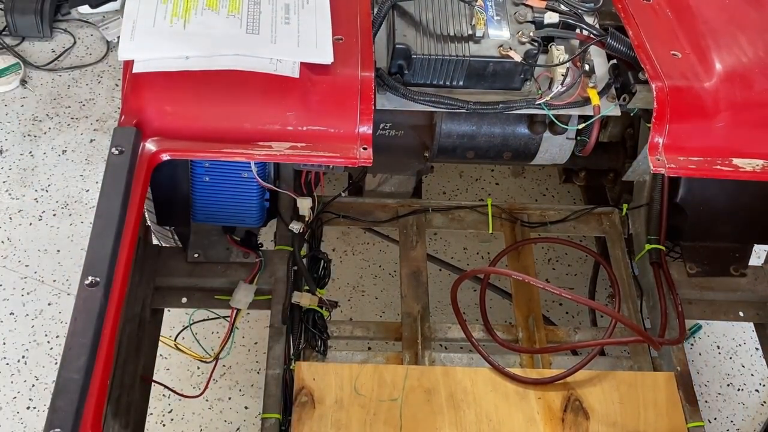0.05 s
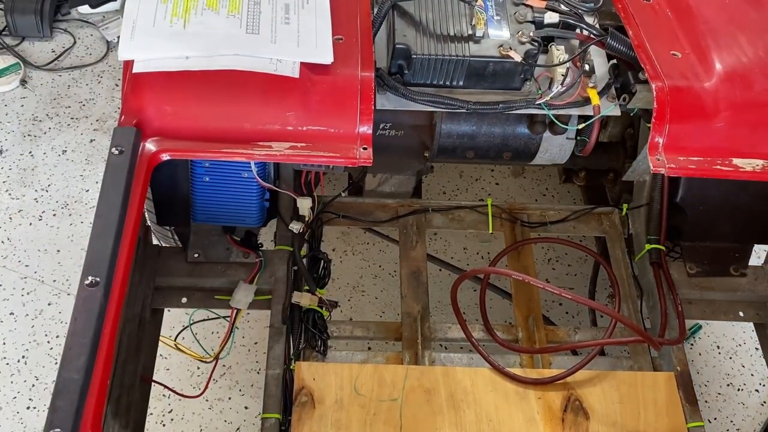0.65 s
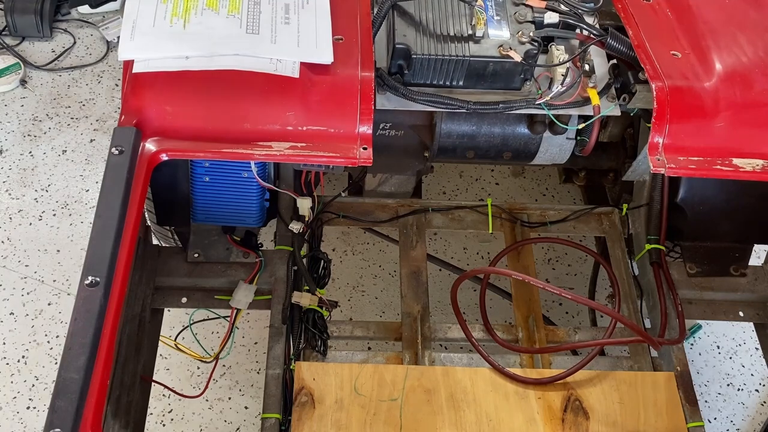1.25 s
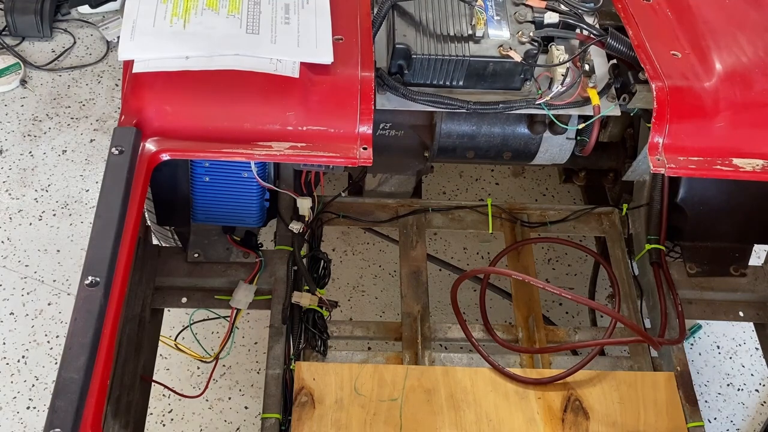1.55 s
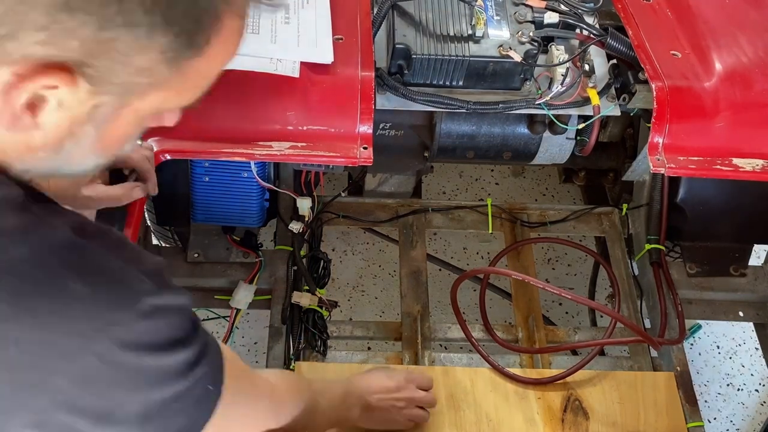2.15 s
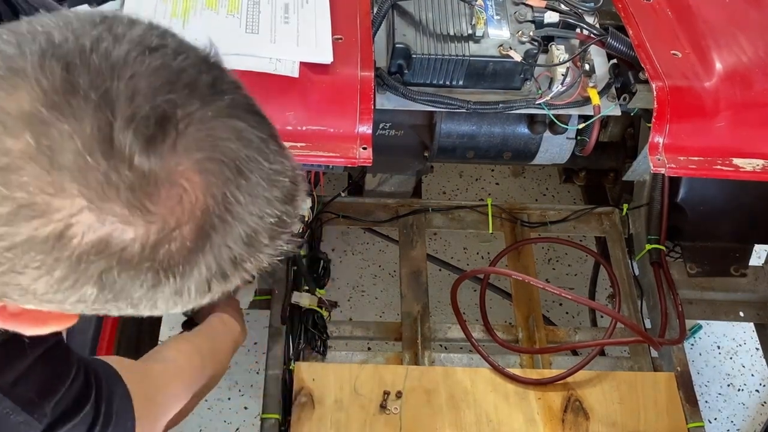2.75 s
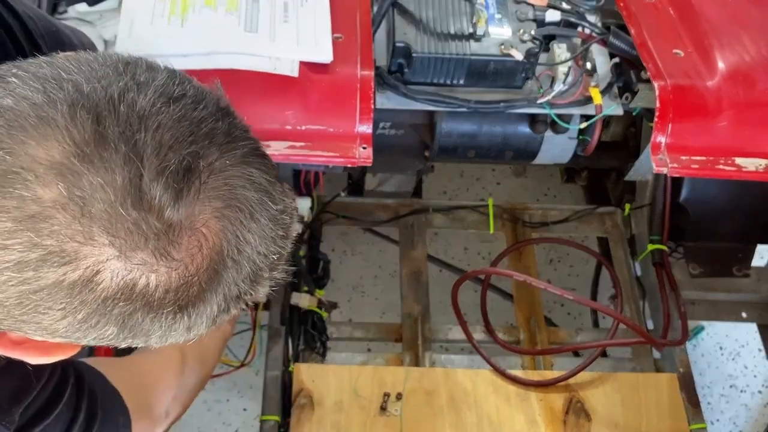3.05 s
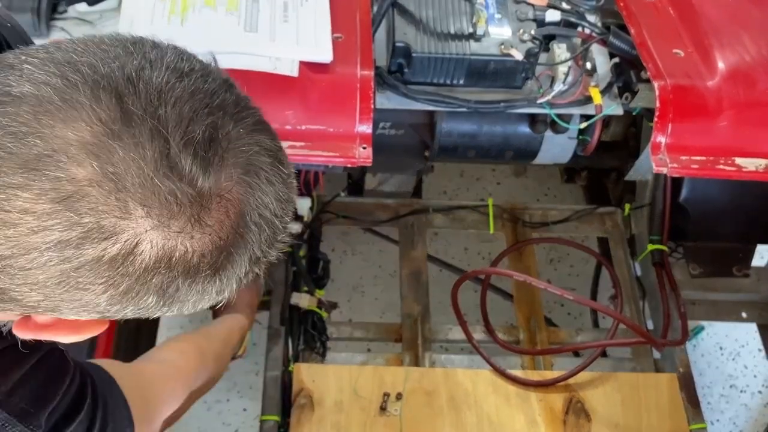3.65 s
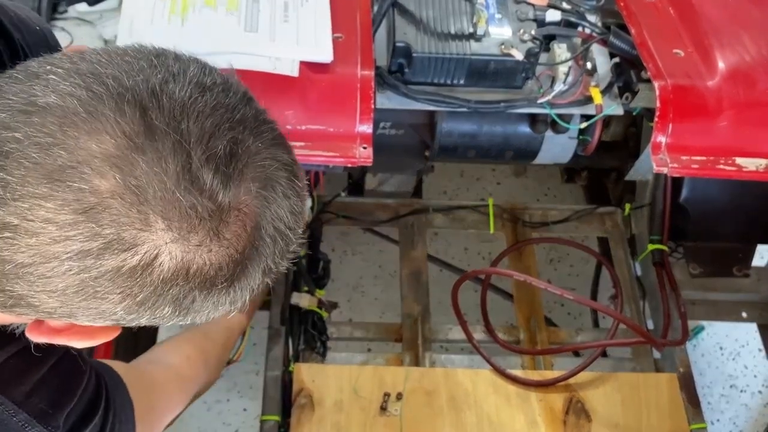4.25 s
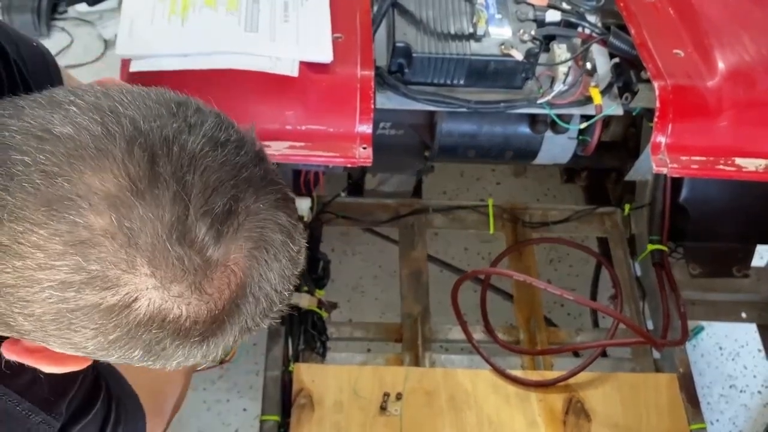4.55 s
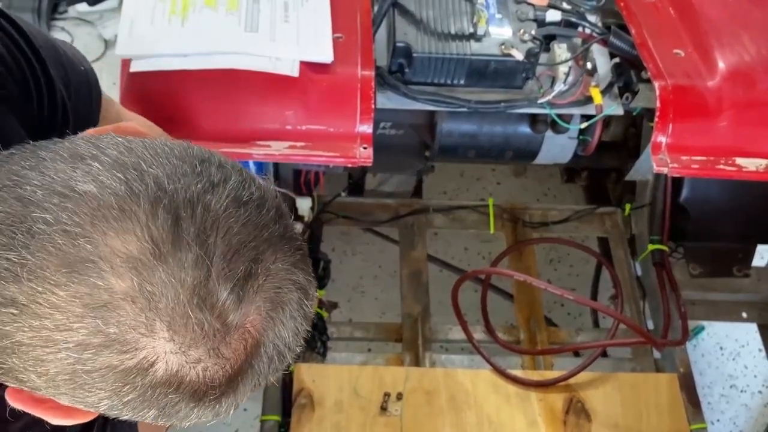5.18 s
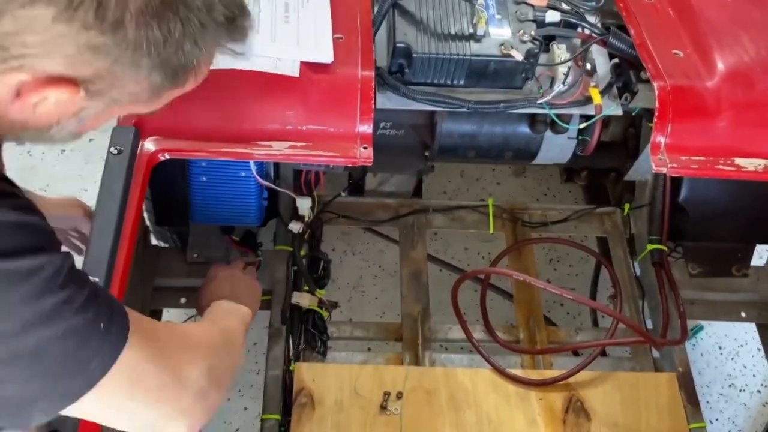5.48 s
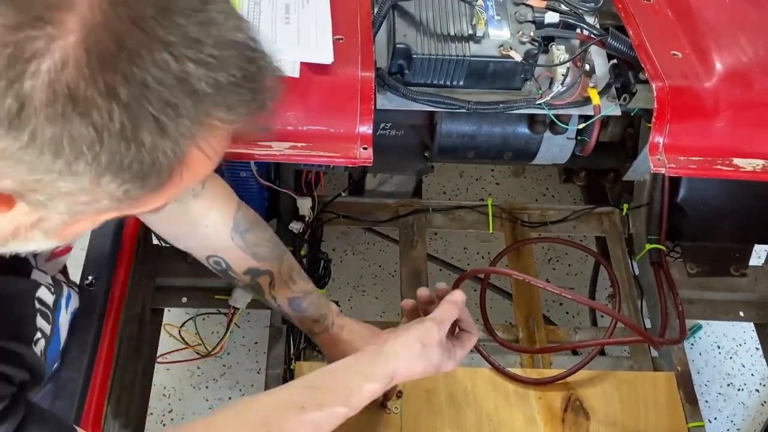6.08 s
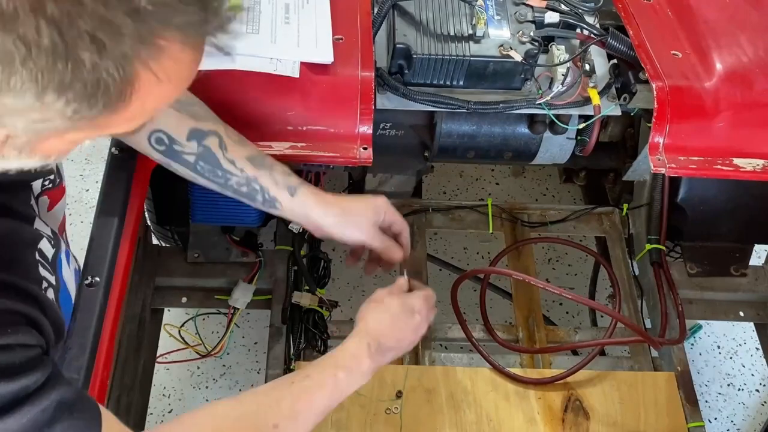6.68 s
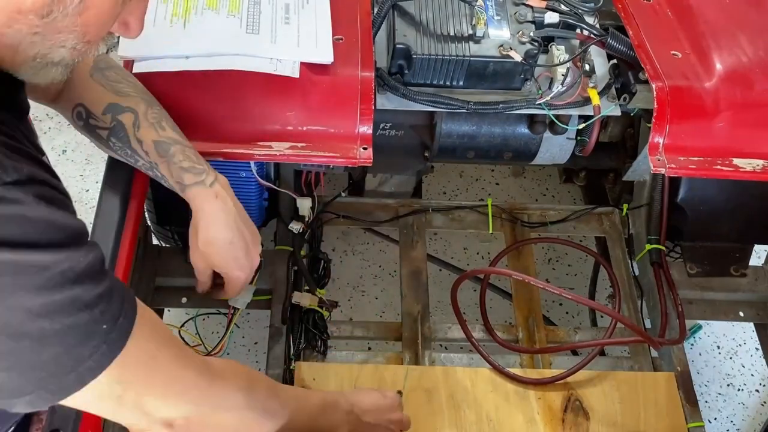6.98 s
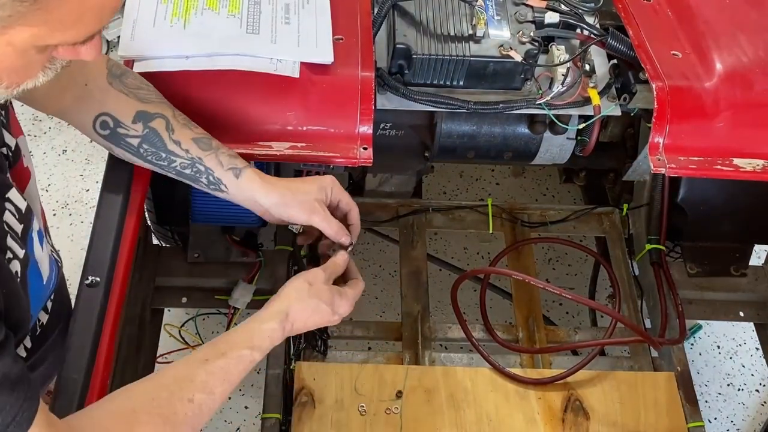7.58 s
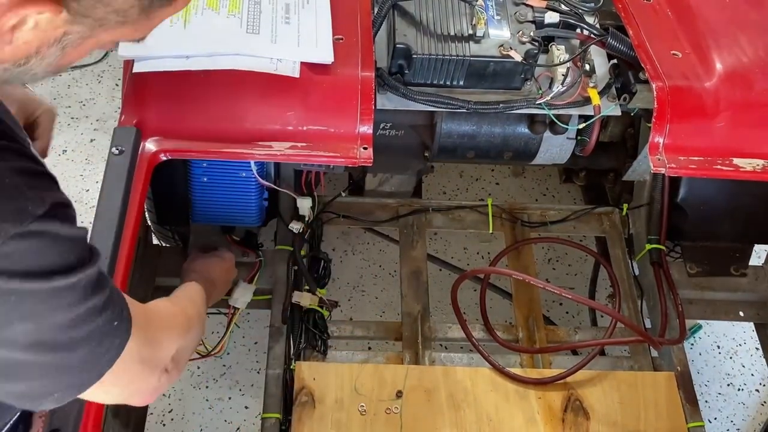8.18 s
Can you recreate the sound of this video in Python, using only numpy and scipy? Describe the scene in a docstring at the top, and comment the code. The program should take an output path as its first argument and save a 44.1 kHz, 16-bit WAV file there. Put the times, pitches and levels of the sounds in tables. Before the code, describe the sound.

Small steel parts are handled up close over the steady low hum of a machine in a garage. Soft knocks and cloth swishes lead to a quick clatter of fasteners on wood. Washers chatter on bolts, muted by fingers, and hands thump a metal frame. The sharpest clink settles in a few dull taps, followed by sparse light clicks and some closing knocks.

```python
"""In a garage, steel washers are picked off a board and fitted over bolts on the frame of a small cart.
Fingers damp them, so each clink is a short chatter that shakes bracket and frame. Loose hardware
clatters and ticks, hands knock the board and frame, and sleeves rustle as the arms move.
Nearby panels and the walls scatter the contacts; behind them a machine rumbles and hums low."""
import sys
import numpy as np
from scipy import signal
from scipy.fft import rfft, irfft, next_fast_len
from scipy.io import wavfile
from scipy.ndimage import map_coordinates

SR = 44100
rng = np.random.default_rng(int(sys.argv[2]) if len(sys.argv) > 2 else 0)


def put_to_file(sound):
    """Save the sound as 16-bit audio at rate SR, in the file named by the first command-line argument."""
    columns = np.atleast_2d(sound).T  # one column per channel
    safe = np.clip(columns, -1, 1)
    whole_steps = np.round(safe * 32767)
    wavfile.write(sys.argv[1], SR, whole_steps.astype(np.int16))


N = 367353

# Washer hits: t/s, swell/s, t60/s, blow/dB, clank over blow/dB, ring over blow/dB,
# edge over ring/dB, note over ring/dB, pitch/Hz
CLINKS = [(3.113, 0.0059, 0.04, -42, -7, -12.5, -11, -10, 7240),
          (3.132, 0.014, 0.061, -43.5, 3.5, -9, -20, -4, 7100),
          (3.173, 0.0042, 0.049, -38, -19, 3, -1.5, -12.5, 6160),
          (3.221, 0.01, 0.045, -53, 3, -5, -2, -6, 7100),
          (3.362, 0.011, 0.022, -44, -1.5, 0, 0.5, -0.5, 7320),
          (3.411, 0.0043, 0.06, -45, -1.5, 4, -8, -0.5, 6830),
          (4.929, 0.0053, 0.028, -42.5, 4, 4, -23.5, 7, 5330),
          (5.073, 0.0027, 0.031, -47, 7, -3, -32, -0.5, 6740),
          (5.137, 0.0047, 0.035, -62.5, 7.5, -1.5, -8, 9, 6900),
          (5.184, 0.0075, 0.22, -44.5, 0, -9, 4, -3.5, 6000),
          (5.2274, 0.004, 0.004, -30.5, 1.5, -7.5, 5.5, 7, 6820),
          (8.255, 0.0024, 0.016, -52.5, 5, 4, -37.5, 2.5, 6950)]
# Modes of the struck parts: f/Hz, width/Hz, level/dB
FRAME = [(190, 90, -3), (305, 110, -.5), (460, 130, 0), (790, 260, -1.5)]  # the cart's low thud
BRACKET = [(1815, 130, -2), (2490, 160, -5), (3270, 180, 0)]
CLANK = [(1385, 190, 0)]  # the bracket's low note
WASHER = [(4600, 450, -2), (5380, 350, -6), (6350, 450, -4), (6950, 400, 2)]
EDGE = [(9850, 700, 0), (10700, 700, -3), (14000, 1500, -14)]  # the washer's top sparkle
# Tone of the steel-on-steel snap: f/Hz, level/dB
SNAP = [(600, -10), (2200, -1), (7800, 0), (15000, -20)]
GRIP_WIDTH_HZ = 320  # fingers damp a ring to this width

def clinks():
    """A held washer chatters on a bolt: it rings at a pitch set by the grip and shakes the cart."""
    track = np.zeros(N)
    for s, rise, t60, blow_db, clank_db, ring_db, edge_db, note_db, pitch_hz in CLINKS:
        effort_db = blow_db + 41.5  # over a middling blow
        washer_db = blow_db + ring_db
        force = chatter(rise, t60, spread_db=4)
        # a light washer hardly moves the frame in the bass
        push = filtered(force, lambda f: 1j * f / (480 + 1j * f))
        add(track, s, -42.5 + .45 * effort_db, ring(push, FRAME))
        add(track, s, blow_db + clank_db, ring(ring(force, gripped(CLANK)), gripped(CLANK)))
        add(track, s, blow_db - .5, ring(force, gripped(BRACKET)))
        add(track, s, washer_db + 4, ring(force, gripped(WASHER)))
        note = [(pitch_hz, GRIP_WIDTH_HZ, 0)]
        add(track, s, washer_db + note_db, ring(ring(force, note), note))
        add(track, s, washer_db + edge_db, ring(force, EDGE))
        # the contact itself snaps and scratches, filling the gaps between the modes
        add(track, s, washer_db + 1.5, equalised(chatter(rise, t60, spread_db=3.5), SNAP))
        # the rattle makes an octave that grows as the square of the blow
        add(track, s, -55.5 + 2 * effort_db, ring(force, [(2 * pitch_hz, 500, 0)]))
    return track


# Hard hits on the board, from loose hardware and a landing fingertip: t/s, contact/s, t60/s, level/dB, thud
# over level/dB, pitch/Hz, treble roll-off/Hz
CLACKS = [(0.234, 0.0033, 0.088, -58.5, -23, 2840, 11100), (1.672, 0.0044, 0.042, -47.5, -8.5, 3000, 13800),
          (2.1849, 0.00041, 0.0092, -32, -10, 2420, 5200), (2.247, 0.0032, 0.092, -36.5, -20, 2350, 3600),
          (2.313, .012, 0.11, -43, -38, 2530, 9200), (2.68, 0.0019, 0.067, -56.5, -2, 3600, 7000),
          (6.899, 0.0026, 0.1, -60, -0.5, 3360, 7560), (7.271, 0.0013, 0.019, -50.5, -8, 5500, 6000)]
# Modes of the wooden board: f/Hz, width/Hz, level/dB
BOARD = [(1000, 350, -1.5), (1330, 250, -3), (1950, 400, -5), (2490, 250, -1), (3600, 700, -2)]

def clacks(clatter_width_hz=10400):
    """Loose hardware, and once a fingertip, clatters on the wooden board, whose give takes off the treble."""
    track = np.zeros(N)
    for s, contact_s, t60, db, thud_db, pitch_hz, top_hz in CLACKS:
        force = chatter(contact_s, t60, spread_db=3)
        soften = signal.butter(2, top_hz, fs=SR)
        clatter = signal.lfilter(*soften, signal.lfilter(*soften, force))
        add(track, s, db, ring(clatter, [(pitch_hz, clatter_width_hz, 0)]))
        add(track, s, db - .5, ring(force, [(pitch_hz, GRIP_WIDTH_HZ, 0)]))
        add(track, s, db + thud_db, ring(force, FRAME[-1:] + BOARD[:2]))
    return track


# Hand hits: t/s, contact/s, thump/dB, hardness (clack over thump)/dB
KNOCKS = [(0.384, 0.007, -60, -14), (0.979, 0.012, -54, -5.5), (1.124, 0.003, -62.5, -1.5),
          (1.289, 0.011, -47, -19.5), (1.433, 0.0071, -53.5, -9.5), (1.556, 0.0094, -50, -13),
          (1.797, 0.026, -44, -11), (2.717, 0.0056, -50, -10.5), (2.877, 0.0086, -49.5, -14.5),
          (2.944, 0.0027, -57, -14.5), (3.045, 0.007, -55.5, -19.5), (3.552, 0.0024, -41.5, -15),
          (3.992, 0.011, -37.5, -19), (4.462, 0.0041, -47.5, -23), (4.528, 0.0063, -36, -29.5),
          (4.635, 0.027, -42.5, -19.5), (4.66, 0.0084, -41.5, -16.5), (4.694, .004, -51.5, -7),
          (4.716, 0.019, -40, -13), (5.654, 0.0019, -52.5, -12), (5.801, 0.003, -48.5, -8.5),
          (6.938, 0.0027, -51.5, -18), (6.965, 0.0023, -61, -5.5), (8.205, 0.0026, -43.5, -3.5),
          (8.27, 0.0015, -43.5, -11.5), (8.304, 0.0047, -41, -10.5)]
# Tone of a hand scuffing the board: f/Hz, level/dB
SCUFF = [(1000, -16), (5000, -20), (15000, -22)]

def knocks(slide_s=.038):
    """Knuckles meet frame and board: a soft contact thumps, a hard one clacks, a slow one scuffs."""
    track = np.zeros(N)
    for s, contact_s, thump_db, hardness_db in KNOCKS:
        t60 = .071 * (contact_s / .0066) ** .52  # a slower contact also dies more slowly
        force = chatter(contact_s, t60, spread_db=4.5)
        corner_hz = 634 * amp(.65 * hardness_db)  # a soft push shakes only the lowest modes
        push = filtered(force, lambda f: 1 / (1 + 1j * f / corner_hz))
        add(track, s, thump_db, ring(push, FRAME))
        clack_db = thump_db + hardness_db
        damping = 2 + contact_s / slide_s  # a hand that stays on the board deadens it
        damped_board = [(hz, width * damping, db) for hz, width, db in gripped(BOARD)]
        add(track, s, clack_db, ring(force, damped_board))
        add(track, s, clack_db - .5, ring(force, gripped(CLANK)))
        slide_db = 20 * np.log10(contact_s / (contact_s + slide_s))
        add(track, s, clack_db + 20.5 + slide_db, equalised(force, SCUFF))
    return track


def settling(count, start_s=5.287, gap_s=.042, first_db=-52, loss_db=2):
    """After the hardest clink a loose part rocks to rest in even, dull taps on frame and bracket."""
    track = np.zeros(N)
    for k in range(count):
        force = chatter(rise=.0014, t60=.017, spread_db=12.5)
        add(track, start_s + k * gap_s, first_db - k * loss_db, ring(force, FRAME + CLANK + BRACKET[:1]))
    return track


# Tiny edge-on ticks: t/s, level/dB, t60/s
TICKS = [(0.136, -43, 0.018), (4.147, -51.5, 0.0048), (4.186, -50.5, 0.016), (4.255, -47, .025),
         (4.303, -50.5, 0.07), (7.999, -53.5, 0.072)]
# Their bright tone: f/Hz, level/dB
TICK_TONE = [(2000, -10), (5500, -3), (10000, 4), (15000, 3.5)]

def ticks():
    """Small parts touch edge to edge between the fingers, too damped to ring."""
    track = np.zeros(N)
    for s, db, t60 in TICKS:
        force = chatter(rise=.091 * t60, t60=t60, spread_db=7)
        add(track, s, db, equalised(force, TICK_TONE))
    return track


# Swishes of cloth and shoe: t/s, half length/s, level/dB
BRUSHES = [(.009, 0.0095, -51.5), (0.149, 0.038, -59), (0.73, 0.022, -62.5), (0.887, 0.018, -60.5),
           (1.783, 0.095, -61.5), (2.189, 0.027, -48)]
# Rubbing squeaks: t/s, half length/s, level/dB, pitch/Hz
SQUEAKS = [(1.92, .011, -60.5, 3500), (2.0, 0.016, -61, 1060), (4.17, .075, -72.5, 1870),
           (6.02, .025, -75, 4550), (6.64, .035, -74.5, 4450)]

def brushes():
    """Cloth brushes with a broad hiss; rubbing surfaces squeak faintly in a narrow band."""
    cloth = sum(stroke(*row, hz=2880, width_hz=5000) for row in BRUSHES)
    squeaks = sum(stroke(s, half, db, hz, width_hz=.2 * hz) for s, half, db, hz in SQUEAKS)
    return cloth + squeaks


def stroke(s, half, db, hz, width_hz):
    """A stroke of friction: a swell of grainy noise around one resonance."""
    track, t = np.zeros(N), np.arange(N) / SR
    near = np.abs(t - s) < .15
    grains = amp(2 * rng.standard_normal(near.sum())) * rng.standard_normal(near.sum())
    swell = np.exp(-.5 * ((t[near] - s) / half) ** 2)
    body = [(hz, width_hz, 0)]
    track[near] = amp(db) * swell * unit(ring(ring(grains, body), body))
    return track


# Fader ride of the moving arms: t/s, relative level/dB
ARM_MOTION = [(0.0, -72.5), (0.37, -80), (1.37, -73), (1.81, -68), (2.6, -76), (3.43, -72), (3.76, -78.5),
              (4.43, -72.5), (4.89, -74.5), (5.24, -70), (6.52, -79.5), (7.89, -81.5), (8.33, -68)]
# Tone of the sleeve cloth: f/Hz, level/dB
SLEEVE = [(150, 25), (900, 16), (6000, 4.5), (12000, 0)]

def sleeves():
    """Sleeves rub as the arms move; catching fibres make the rustle grainy."""
    strokes_db = 1.5 * wobble(30)
    fibres = unit(amp(1.5 * wobble(650)))
    return amp(ride(ARM_MOTION) + 8 + strokes_db) * fibres * stereo_noise(SLEEVE)


# Fader ride shared by rumble and hum: t/s, relative level/dB
MACHINE_LEVEL = [(0.0, -54.5), (1.76, -51), (6.17, -51.5), (6.45, -55), (8.33, -52)]
# Tones of the fan's rumble and of its airflow: f/Hz, level/dB
RUMBLE = [(15, -7.5), (45, -5.5), (65, 2), (98, 2), (135, -5), (200, -14), (400, -28.5), (1000, -82.5)]
AIR = [(100, -10.5), (250, 4), (750, -4), (1400, -12), (2300, -20), (7000, -65)]

def machine():
    """A fan rumbles and moves air, with a wavering hum and a thin whistle."""
    level_db = ride(MACHINE_LEVEL)
    hum_hz = 97 + 2.82 * wobble(5)
    hum = amp(level_db - 8 + .82 * wobble(3.2)) * np.sin(2 * np.pi * np.cumsum(hum_hz) / SR)
    air = amp(-66.8 + .9 * wobble(6)) * stereo_noise(AIR)
    whistle = amp(-80) * unit(ring(rng.standard_normal((2, N)), [(2964, 55, 0)]))
    rumble = amp(level_db - 1.5) * stereo_noise(RUMBLE)
    return rumble + hum + air + whistle


# Decay off the nearby panels and off the walls: f/Hz, t60/s
PANELS = [(7000, 0.077), (14000, 0.083)]
WALLS = [(150, 0.36), (4000, 0.13), (15000, 0.03)]

def garage(x, panels_db, walls_db, new_place_s=.3):
    """Panels scatter at once and walls add a faint tail, both drawn afresh as the hands move on."""
    heard, step = x.copy(), round(new_place_s * SR)
    for i in range(0, N, step):
        panels, walls = tail(PANELS), tail(WALLS)
        t = np.arange(walls.shape[1]) / SR
        room = amp(panels_db) * unit(panels * (t > .003)) + amp(walls_db) * unit(walls)
        echo = signal.fftconvolve(x[:, i:i + step], room / np.sqrt(len(t)), axes=1)[:, :N - i]
        heard[:, i:i + echo.shape[1]] += echo
    return heard


def tail(t60s):
    """Dense reflections: stereo noise in which each band dies at its own rate."""
    hz, t, bands = signal.stft(rng.standard_normal((2, SR // 2)), SR, nperseg=256)
    return signal.istft(bands * amp(-60 * t / along(t60s, hz)[:, None]), SR, nperseg=256)[1]


# Phase lead of the left channel: f/Hz, lead/rad
LEFT_LEAD = [(300, 0.11), (1300, 1.15), (2500, 1.5)]

def placed(x, pan_db):
    """The hands reach the left channel a little earlier, and louder in the midrange."""
    def left_and_right(f):
        tilt_db = along([(350, -2.7), (1500, pan_db), (4500, pan_db), (9000, .2)], f)
        lead = along(LEFT_LEAD, f)
        return np.array([amp(side * tilt_db) * np.exp(1j * side * lead) for side in (.5, -.5)])
    return filtered(x, left_and_right)


# Stereo image of the noise beds: f/Hz, left-right correlation
LIKENESS = [(60, 0.97), (150, 0.97), (500, 0.29), (12000, 0.046)]

def stereo_noise(tone):
    """Shaped noise, alike on both sides in the bass and wide in the treble; its mid has rms 1."""
    def mid_and_side(hz):
        angle = np.arccos(along(LIKENESS, hz)) / 2
        return amp(along(tone, hz)) * [np.cos(angle), np.sin(angle)]
    mid, side = filtered(rng.standard_normal((2, N)), mid_and_side)
    return np.array([mid + side, mid - side]) / np.std(mid)


PEAK_S = .1  # where a contact peaks within its own buffer

def chatter(rise, t60, spread_db):
    """Contact force: tiny impacts of uneven size swell to a peak, then die away."""
    t = np.arange(SR // 3) / SR - PEAK_S
    size, push = rng.standard_normal((2, len(t)))
    envelope_db = np.where(t < 0, -14 * (t / rise) ** 2, -60 * t / t60)
    force = amp(envelope_db + spread_db * size) * push
    # the more abrupt the contact, the more of it lands as one hard blow
    force[np.argmax(t >= 0)] += np.linalg.norm(force) * np.exp(-rise / .0029)
    return force


def add(track, s, db, sound):
    """Place a contact with its peak at s; db is its energy spread over 10 ms."""
    start = round((s - PEAK_S) * SR)
    sound = amp(db) * sound * np.sqrt(.01 * SR / np.sum(sound ** 2))
    first, last = max(start, 0), min(start + len(sound), N)
    track[first:last] += sound[first - start:last - start]


def gripped(modes):
    """The modes, all shifted a little by the hand that holds the part."""
    shift = 1 + .018 * rng.standard_normal()
    return [(hz * shift, width, db) for hz, width, db in modes]


def ring(x, modes):
    """x through a bank of damped resonances of alternating polarity."""
    return filtered(x, lambda f: sum((-1) ** k * amp(db) * 1j * f * w / (hz * hz - f * f + 1j * f * w)
                                     for k, (hz, w, db) in enumerate(modes)))


def equalised(x, tone):
    """x through an EQ curve of (f/Hz, level/dB) points."""
    return filtered(x, lambda f: amp(along(tone, f)))


def filtered(x, response):
    """x times a complex response of frequency."""
    n = x.shape[-1]
    padded = next_fast_len(n + 8192)
    return irfft(rfft(x, padded) * response(np.fft.rfftfreq(padded, 1 / SR)), padded)[..., :n]


def along(points, hz):
    """(f/Hz, value) points read on a log axis."""
    f, values = np.transpose(points)
    return np.interp(np.log(hz + 1), np.log(f + 1), values)


def ride(points):
    """(t/s, level/dB) points as one level per sample."""
    return np.interp(np.arange(N) / SR, *np.transpose(points))


def wobble(rate):
    """A smooth random curve, rate knots a second."""
    return map_coordinates(rng.standard_normal(int(N * rate / SR) + 4), [np.arange(N) * rate / SR])


def amp(db):
    """Decibels to gain."""
    return 10 ** (np.asarray(db) / 20)


def unit(x):
    """Scale to rms 1."""
    return x / np.sqrt(np.mean(x ** 2) + 1e-20)


def scene():
    """Handling noises up close in the garage, over the machine's bed slightly to the right."""
    hands = clinks() + clacks() + knocks() + settling(count=3) + ticks() + brushes()
    in_room = garage(placed(hands, pan_db=2), panels_db=-7.5, walls_db=-25.5)
    return in_room + sleeves() + machine() * amp([[-.6], [.6]])


# Tone of the microphone's hiss: f/Hz, level/dB
HISS = [(2000, -14.5), (8400, -21), (9500, 3), (12000, -19), (14400, 4)]
# Dips in the treble near 8.4 and 12 kHz, and a roll-off at the top: f/Hz, level/dB
TREBLE_DIPS = [(7200, 0), (8400, -5), (9800, 0), (12100, -10), (14000, 0), (16000, -16)]
TOP_HZ = 16000

def record(dry):
    """Hiss is added under the scene; the treble also dips in two places, and the band ends steeply at the
    recorder's cut-off."""
    sound = dry + amp(-70.5) * stereo_noise(HISS)
    return filtered(sound, lambda hz: amp(along(TREBLE_DIPS, hz)) * (hz < TOP_HZ))


dry = scene()
out = record(dry)
put_to_file(out)
```